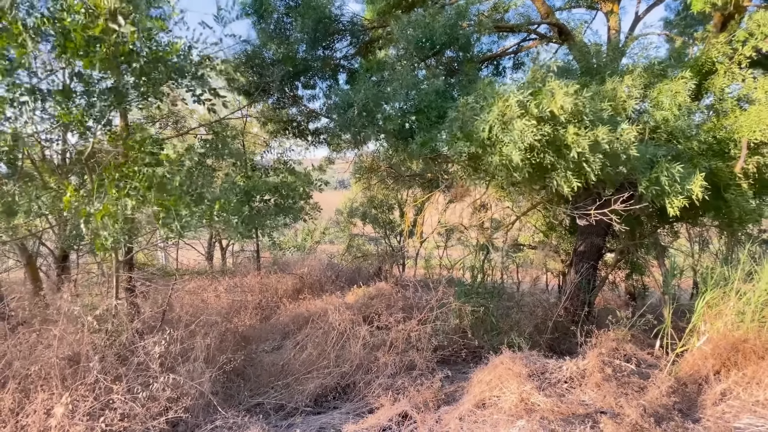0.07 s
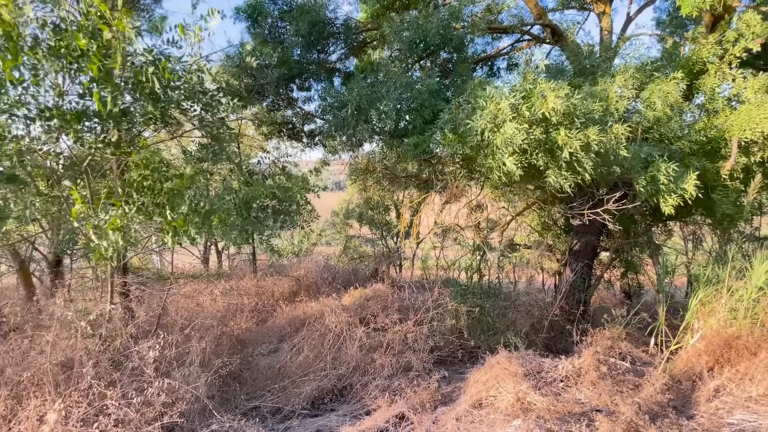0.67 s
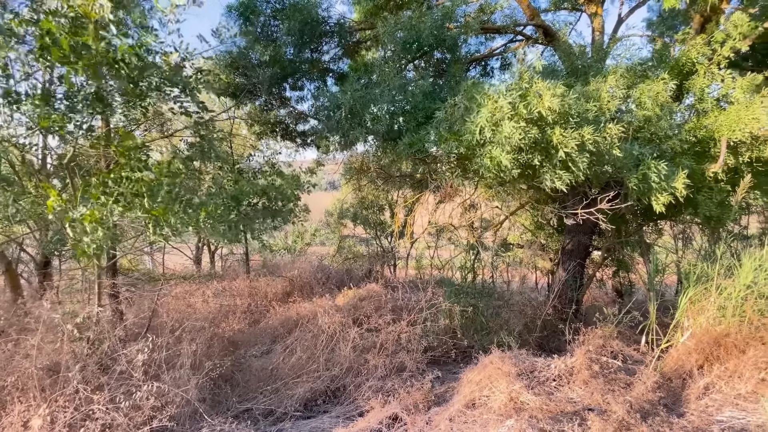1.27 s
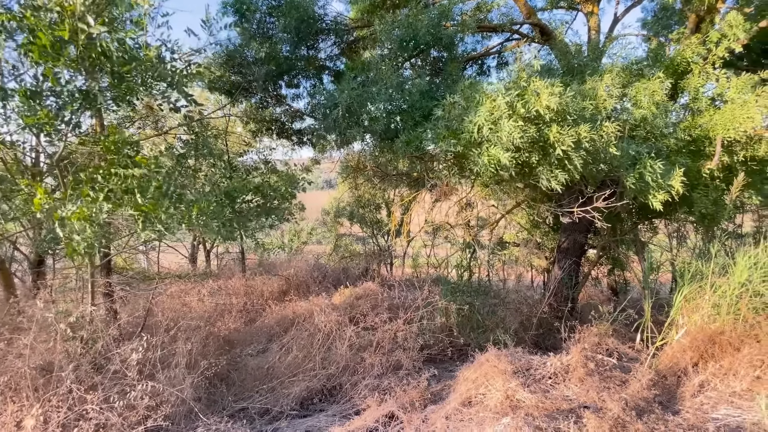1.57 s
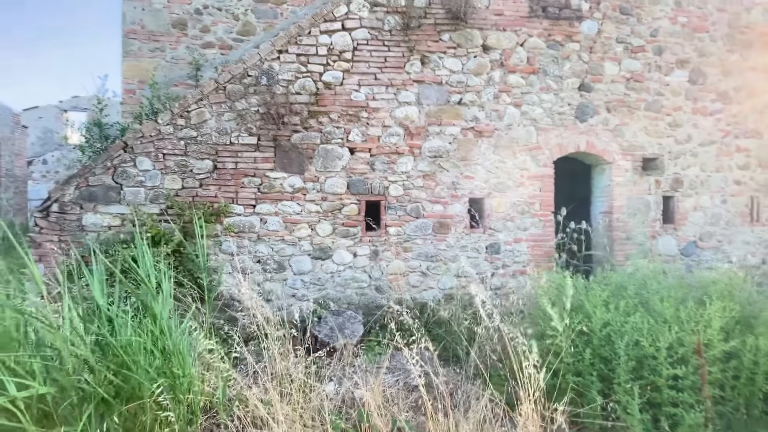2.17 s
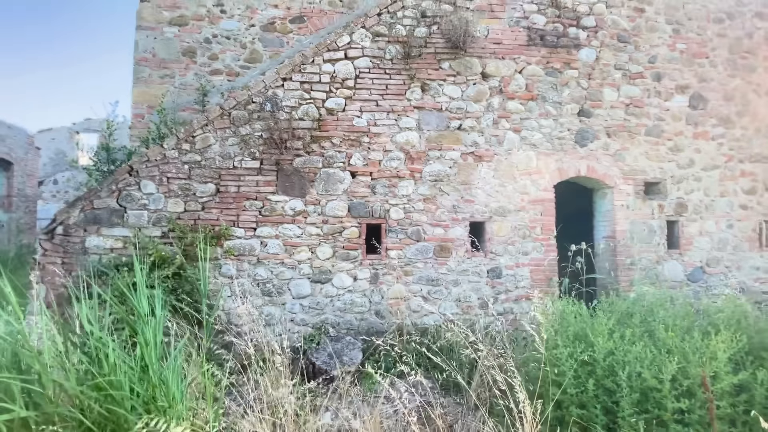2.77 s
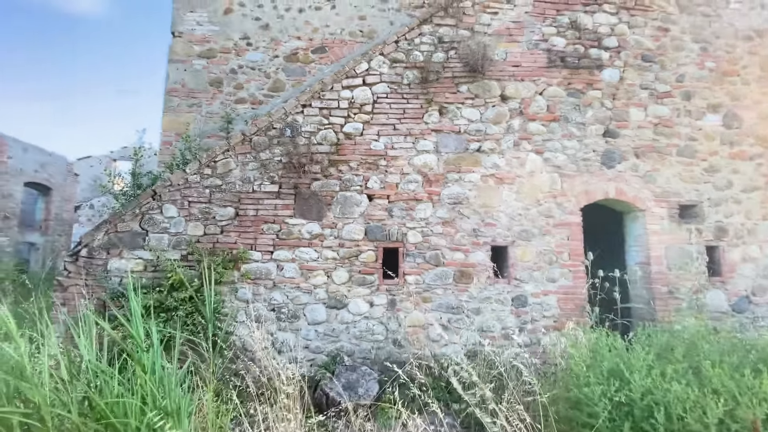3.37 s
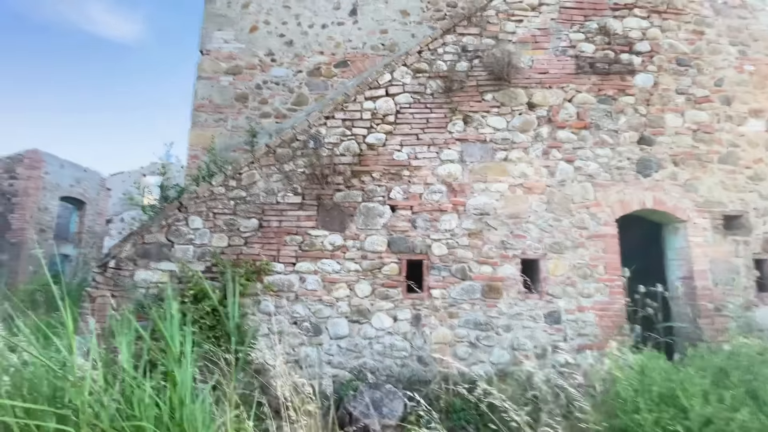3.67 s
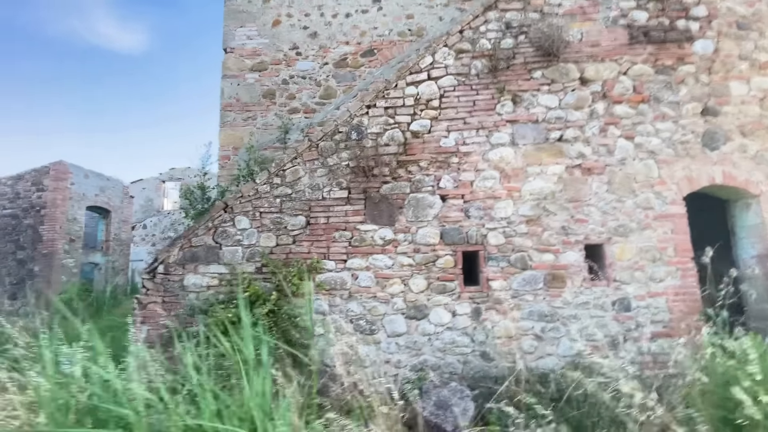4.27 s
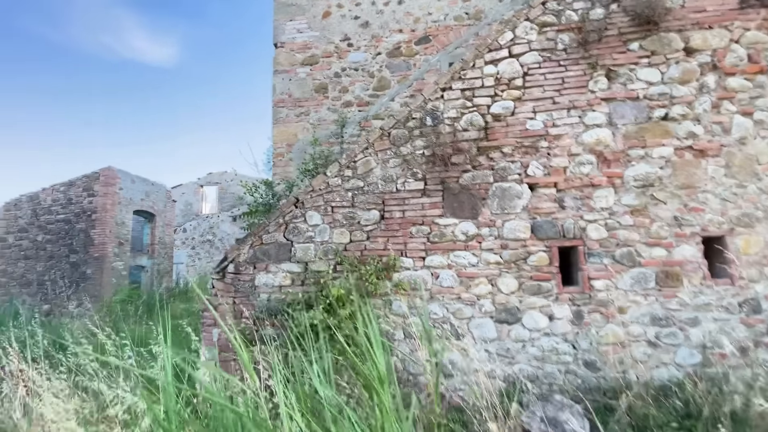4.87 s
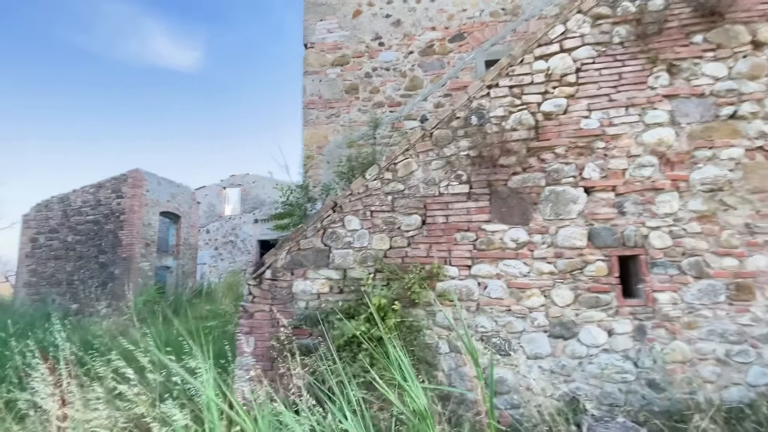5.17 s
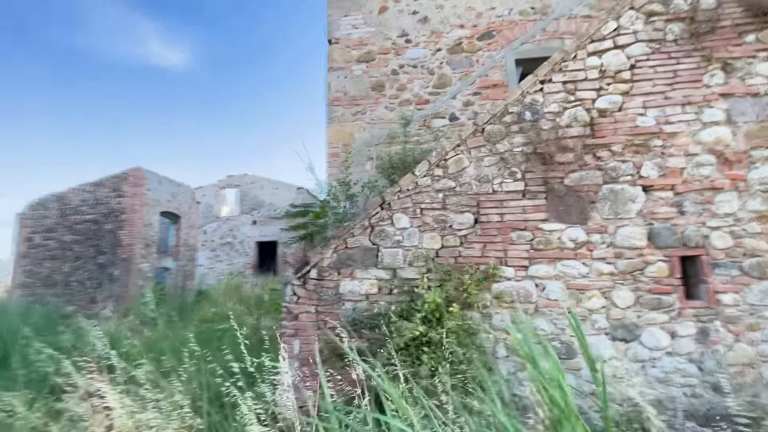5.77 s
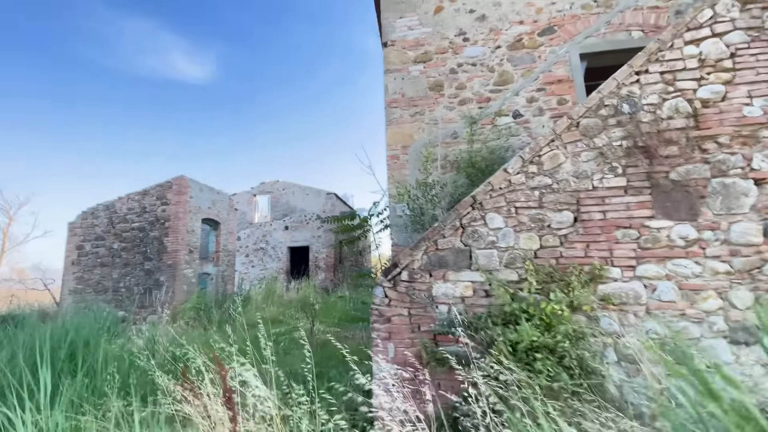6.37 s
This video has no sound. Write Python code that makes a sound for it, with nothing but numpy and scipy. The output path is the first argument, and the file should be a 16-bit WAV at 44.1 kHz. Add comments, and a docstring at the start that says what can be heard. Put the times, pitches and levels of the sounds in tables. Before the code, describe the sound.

Gusts thump on the microphone over a rasping cicada, as slow footsteps brush through dry grass and snap a few stalks.

```python
"""A slow walk through dry summer grass, with turbulence rumbling and fluttering on the two ports of a
hand-held microphone. First, by a thicket, a cicada rasps in shortening phrases as its tymbals buckle
and ring, and a small insect chips. From 2 s, along a stone ruin, the background is fuller, the cicada
keeps a steady beat and far birds call. After 3 s the gusts strike harder, and grass swishes against
the legs and fractures underfoot, with the loudest snap near 5.6 s."""
import sys
import numpy as np
from scipy import signal
from scipy.fft import rfft, irfft, next_fast_len
from scipy.io import wavfile
from scipy.ndimage import uniform_filter1d, map_coordinates

SR = 44100
rng = np.random.default_rng(int(sys.argv[2]) if len(sys.argv) > 2 else 0)


def log_audio(samples):
    """Write samples as a 16-bit WAV file to the path given in sys.argv[1]."""
    # one column per channel
    frames = np.atleast_2d(samples).T
    # limit to full scale, then quantise
    limited = np.clip(frames, -1, 1)
    pcm = np.round(limited * 32767).astype(np.int16)
    wavfile.write(sys.argv[1], SR, pcm)


N = 283033
TIME = np.arange(N) / SR


# Spectra of three sizes of eddy (frequency [Hz], relative density [dB])
LARGE_EDDY = [(12, -19), (25, -53), (40, -12.5), (62, -1.5), (100, -8), (150, -12.5), (250, -21.5),
              (600, -60)]
MIDDLE_EDDY = [(60, -11), (130, -1.5), (200, -0.5), (320, -1), (520, -7.5), (750, -17.5), (1300, -43.5),
               (3000, -80)]
SMALL_EDDY = [(200, -16), (450, 0), (680, 4), (1000, 1), (1400, -8), (2000, -24), (3000, -51), (6000, -76)]
# Balance of the wind between the ports (time [s], left minus right [dB])
WIND_PAN = [(0.0, 7), (1.85, 6.5), (2.1, 4.5), (3.3, -0.5), (3.66, 9), (4.3, -0.5), (6.42, 2)]

def wind(swing_db=1.5, swing_hz=9.3):
    """Turbulent pressure: large eddies rumble on the ports, smaller ones flutter higher and faster."""
    large, middle, small = gusts() * from_db(swing_db * drift(swing_hz))
    rumble = large * eddies(LARGE_EDDY, spurt_db=3, flutter_hz=22.6, alike=0.4, span_s=0.059)
    flutter = middle * eddies(MIDDLE_EDDY, spurt_db=4.5, flutter_hz=51.3, alike=-0.011, span_s=0.039)
    sputter = small * eddies(SMALL_EDDY, spurt_db=5.5, flutter_hz=91, alike=-0.15, span_s=0.05)
    pressure = from_db(2.5) * rumble + from_db(0.02) * flutter + from_db(1.57) * sputter * pan(3.7)
    return pressure * pan(in_time(WIND_PAN)[0])


def eddies(spectrum, spurt_db, flutter_hz, alike, span_s):
    """Intermittency: turbulence comes in ragged spurts, partly different at each port."""
    spurts = drift(flutter_hz) + 0.55 * np.array([drift(flutter_hz), drift(flutter_hz)])
    return evened(colour(stereo_noise(alike) * from_db(spurt_db * spurts), spectrum), span_s)


# Flow between gusts (time [s], large-eddy level [dB], middle-eddy level [dB])
BREEZE = [(0.0, -46.5, -48), (0.35, -55.5, -52), (1.1, -50.5, -46.5), (1.9, -47.5, -51.5),
          (2.13, -50.5, -57.5), (2.42, -41, -50.5), (2.54, -53.5, -62), (2.68, -41, -46.5),
          (3.05, -43, -49.5), (3.62, -41, -40), (3.85, -47, -44), (4.25, -49, -50), (4.6, -45.5, -41.5),
          (4.8, -52.5, -63), (4.97, -48.5, -53), (5.25, -45, -55), (5.6, -41.5, -48.5), (5.95, -41, -47),
          (6.22, -48.5, -60.5), (6.42, -49, -51)]
# Gusts; hardness trades rumble for flutter (start [s], end [s], strength [dB], hardness [dB])
GUSTS = [(0.207, 0.321, -58, 17), (0.403, 0.694, -50.5, 12), (1.052, 1.178, -43.5, 0),
         (1.297, 1.395, -45.5, 3), (2.025, 2.093, -44.5, -13), (2.161, 2.24, -53, -18.5),
         (2.747, 2.958, -41.5, -5.5), (2.808, 2.842, -39, 7.5), (3.129, 3.405, -33, 0.5),
         (3.412, 3.482, -37.5, 9.5), (3.512, 3.553, -38, 8.5), (3.591, 3.695, -45.5, -15.5),
         (3.728, 4.057, -49.5, 10.5), (4.032, 4.10, -35, -2), (4.409, 4.546, -34.5, -2),
         (4.893, 4.964, -44, -6.5), (5.007, 5.137, -38, -4), (5.171, 5.218, -40, -4),
         (5.281, 5.418, -36.5, -5), (5.43, 5.567, -41, -13.5), (5.738, 5.807, -35, -8.5),
         (6.334, 6.4, -47.5, -12.5)]

def gusts(rise_s=0.019, fall_s=0.028):
    """Incoherent addition: gusts and breeze sum in power, giving an amplitude for each eddy size."""
    rumble_db, flutter_db = in_time(BREEZE)
    power = from_db([rumble_db, flutter_db, flutter_db - 14.5]) ** 2
    for start, end, db, hard_db in GUSTS:
        rise = np.interp(TIME, [start - rise_s / 2, start + rise_s / 2], [0, 1])
        fall = np.interp(TIME, [end - fall_s / 2, end + fall_s / 2], [1, 0])
        amplitudes = from_db([db - 4 - 0.87 * hard_db, db, db - 9 + hard_db])   # large, middle, small
        power += np.outer(amplitudes, rise * fall) ** 2
    return np.sqrt(power)


# Spectrum of a crack of air (frequency [Hz], relative density [dB])
CRACK = [(200, -54), (500, 8), (900, 6.5), (1450, 0), (2000, -12), (3000, -29), (6000, -44)]
# Slaps of air (time [s], relative crack level [dB], relative thump level [dB])
BUFFETS = [(0.034, -44.5, -36), (0.087, -34.5, -30.5), (0.189, -45, -38.5), (0.386, -42, -46),
           (0.414, -33.5, -41), (0.432, -36.5, -43), (0.555, -30.5, -40.5), (0.665, -35.5, -52),
           (1.053, -33.5, -43), (1.074, -35, -37), (1.338, -34.5, -41), (1.441, -45.5, -36),
           (2.372, -50, -39.5), (2.827, -37, -29), (3.214, -22.5, -47), (3.235, -27.5, -30),
           (3.36, -32, -25), (3.42, -44, -30), (3.455, -36, -43), (3.528, -19.5, -39), (3.598, -36.5, -46),
           (3.678, -30, -32), (3.791, -23, -36), (3.935, -34, -36), (4.022, -32.5, -29.5),
           (4.52, -32, -29.5), (4.605, -60, -32.5), (4.641, -66, -35.5), (5.091, -39, -29.5),
           (5.348, -33.5, -31.5), (5.776, -32.5, -30.5)]

def buffets(haste=0.067, lowpass_hz=3600):
    """Pressure transients: an eddy bursts on a port with a thump and a crack, shorter when harder."""
    s, crack_db, thump_db = np.transpose(BUFFETS)
    shortening = from_db(-haste * (crack_db - np.median(crack_db)))
    crack = evened(colour(stereo_noise(0.27), CRACK), span_s=0.0013)
    crack *= bursts(s, crack_db - 5.5, rise_s=0.0027 * shortening)
    thump = evened(colour(stereo_noise(0.001), MIDDLE_EDDY), span_s=0.0044)
    thump *= bursts(s, thump_db - 0.5, rise_s=0.0045)
    lowpass = signal.butter(3, lowpass_hz, fs=SR, output="sos")
    return signal.sosfilt(lowpass, crack * pan(11.2) + thump * pan(2.5))


# Single large eddies (time [s], peak level [dB], centre frequency [Hz])
BUMPS = [(0.157, -32, 140), (0.724, -34, 88), (2.848, -24, 85), (2.927, -24.5, 175), (3.142, -23.5, 91.5),
         (5.107, -20.5, 125), (5.296, -33, 148), (5.783, -22, 170)]

def bumps():
    """Convected pressure: a passing eddy pushes once on the ports, with a dip before and after."""
    out = np.zeros(N)
    for s, db, hz in BUMPS:
        square = np.minimum((np.pi * hz * (TIME - s)) ** 2, 20)
        out += from_db(db) * (1 - 2 * square) * np.exp(-square)
    return out * pan(3.8)


# Spectra of leaves and of dry seed heads (frequency [Hz], relative density [dB])
SOFT_GRASS = [(400, -15), (1200, 4), (2000, -1.5), (2800, -4), (4000, -2.5), (6500, -1), (7800, -4.5),
              (9000, 5.5), (10000, -1.5), (12000, -9), (16000, -7)]
CRISP_GRASS = [(1000, -27), (4000, 1.5), (8000, -43), (10500, 1.5), (13000, 1.5), (14500, 5.5), (16000, 5)]
# Grass brushing the legs throughout (time [s], swish level [dB], crackle level [dB])
BRUSHING = [(0, -69, -92), (3.72, -72.5, -75), (3.8, -59, -58), (4.3, -64, -69), (5.35, -72, -63),
            (5.7, -68, -58), (6.42, -59, -60.5)]
# A leg passing through a tuft (peak time [s], level [dB], rise constant [s], decay constant [s])
SWEEPS = [(3.21, -60, 0.1, 0.043), (3.93, -54, 0.11, 0.17), (4.12, -55.5, 0.095, 0.092),
          (4.75, -58, 0.12, 0.35), (5.645, -45, 0.089, 0.074), (5.78, -49, 0.12, 0.064),
          (6.25, -56.5, 0.15, 0.12)]

def grass():
    """Friction noise: leaves swish and seed heads crackle, both swelling as a leg sweeps by."""
    soft_db, crisp_db = in_time(BRUSHING)
    sweeps = sum(from_db(db) * np.exp(-np.maximum((s - TIME) / swell, (TIME - s) / fade))
                 for s, db, swell, fade in SWEEPS)
    seed_share = from_db(0.87 * (crisp_db - crisp_db.max()) - 7.5)   # deep grass has more seed heads
    soft = blades(SOFT_GRASS, ticks_per_s=1400, hiss=1.0, alike=0.061)
    soft *= np.hypot(from_db(soft_db), sweeps)
    crisp = blades(CRISP_GRASS, ticks_per_s=1000, hiss=0.86, alike=0.98)
    crisp *= np.hypot(from_db(crisp_db), seed_share * sweeps)
    return soft * pan(2.4) + crisp * pan(0.77)


def blades(spectrum, ticks_per_s, hiss, alike, clump_db=2.0, spread_db=1.5):
    """Shot noise: countless blades tick past one another, in clumps, over a fine hiss."""
    contacts = rng.random(N) < ticks_per_s / SR
    sizes = from_db(spread_db * np.minimum(rng.exponential(1, N), 3.5))
    ticks = rms_one(stereo_noise(alike) * contacts * sizes)
    rustle = (ticks + hiss * stereo_noise(alike)) * from_db(clump_db * drift(36))
    return evened(colour(ground_echo(rustle, delay_s=0.0041, share=0.48), spectrum), span_s=0.043)


# Stalks breaking underfoot (time [s], relative splinter level [dB], relative woody level [dB])
SNAPS = [(1.338, -60, -44), (2.4843, -43, -60), (2.5104, -35, -42), (3.553, -54, -45), (3.7637, -23, -62),
         (3.8215, -21.5, -51), (3.8862, -20.5, -60), (3.9386, -28, -65), (4.1002, -30, -61),
         (5.631, -16.5, -34), (5.6553, -42, -43), (5.6854, -37, -47)]

def snaps():
    """Brittle fracture: a stalk fails fibre by fibre, with a bright splinter and a lower woody crack."""
    s, splinter_db, woody_db = np.transpose(SNAPS)
    fibres = from_db(2.5 * drift(730))
    splinter = colour(stereo_noise(0.1) * fibres,
                      [(3000, -6), (6000, -0.5), (9000, 7), (12000, 2.5), (16000, 5)])
    woody = colour(stereo_noise(0.47) * fibres,
                   [(600, 21), (1800, -4.5), (3500, 8.5), (5000, 7), (8000, -12), (16000, -22)])
    splinter *= bursts(s, splinter_db - 13, rise_s=0.001)
    woody *= bursts(s, woody_db - 1.5, rise_s=0.0026)
    return (splinter + woody) * pan(4.4)


# Tymbal resonances (frequency [Hz], relative density [dB])
TYMBAL = [(2500, -17), (3900, -25), (4400, -8), (4900, 3.5), (5250, -1.5), (5600, -10), (5900, -5),
          (6400, -16), (7000, -3), (7500, -24), (8500, -16), (10000, -20), (16000, -26.5)]
# The nearest cicada (time [s], relative level [dB], left minus right [dB], frequency scale [ratio])
SINGER = [(0, -63.5, 1, 0.96), (1.1, -57, 2, 1), (2.1, -56, 2, 1.006), (2.4, -60, -1, 1.01),
          (3.3, -62, 1.5, 1.005), (4.2, -63.5, 13.5, 1.015), (6.42, -61, 9.5, 1.003)]

def cicada(swell_s=0.052, fade_s=0.046, buckle_hz=220, rasp=0.48):
    """Driven resonance: tymbals buckle about two hundred times a second and ring near 5 kHz."""
    level_db, pan_db, speed = in_time(SINGER)
    effort = np.zeros(N)
    for start, end, db in phrases():
        corners = [start - swell_s / 2, start + swell_s / 2, end - fade_s / 3, end + fade_s]
        effort += from_db(db) * np.interp(TIME, corners, [0.00026, 0.82, 0.79, 0.0023])
    rate_hz = buckle_hz * (1 + 0.0614 * drift(34.7))
    buckles = 1 + rasp * np.cos(2 * np.pi * np.cumsum(rate_hz) / SR)
    ring = colour(stereo_noise(0.059) * buckles, TYMBAL)
    song = np.array([map_coordinates(side, [np.cumsum(speed)], mode="wrap") for side in ring])
    echoed = rms_one(ground_echo(song, delay_s=0.0031, share=0.84))
    return from_db(level_db + 1.94) * effort * echoed * pan(pan_db)


# Cicada phrases by the thicket (start [s])
OPENING = [0, 0.423, 0.845, 1.089, 1.315, 1.525, 1.71, 1.918]

def phrases(beat_from_s=2.029, beat_s=0.13975, jitter_s=0.005, accent_db=1.0):
    """Quasi-periodic rhythm: phrases (start, end, accent) shorten, then settle on a beat."""
    opening_rest_s, beat_rest_s = 0.071, 0.054
    beats = [OPENING[-1], *np.arange(beat_from_s, N / SR, beat_s)]
    spans = [(start, following - opening_rest_s) for start, following in zip(OPENING, OPENING[1:])]
    spans += [(start, start + beat_s - beat_rest_s) for start in beats]
    chance = rng.standard_normal((len(spans), 2)) * [jitter_s, accent_db]
    return [(start + late, end + late, db) for (start, end), (late, db) in zip(spans, chance)]


# Calls of the small insect (start [s], chips [count], relative level [dB])
CHIP_GROUPS = [(0.019, 1, -57), (0.145, 3, -58), (0.518, 2, -57.5), (0.804, 1, -57), (0.946, 1, -55),
               (1.085, 3, -55.5), (1.45, 3, -52.5), (1.834, 2, -52), (2.142, 1, -50), (5.244, 1, -51),
               (5.962, 3, -55), (6.369, 1, -46)]

def chip_train(period_s=0.107):
    """Pulse trains: chips (time, level) recur at a constant period within each group."""
    return [(start + k * period_s, db) for start, count, db in CHIP_GROUPS for k in range(round(count))]


def chips(start_hz=7600, end_hz=8700, length_s=0.014):
    """Frequency modulation: each chip is a brief upward sweep, made scratchy by random deviation."""
    out, size = np.zeros(N + SR), int(length_s * SR)
    scratch_hz = 260 * drift(900)
    for s, db in chip_train():
        at = max(int((s - length_s / 4) * SR), 0)
        hz = np.linspace(start_hz, end_hz, size) + np.resize(scratch_hz[at:], size)
        out[at:at + size] += from_db(db - 9) * np.hanning(size) * np.sin(2 * np.pi * np.cumsum(hz) / SR)
    return out[:N] * pan(6.9)


def sizzle():
    """Decaying band noise: a faint high hiss trails each chip."""
    s, db = np.transpose(chip_train())
    hiss = colour(stereo_noise(0.32),
                  [(8000, -18), (9500, -1), (10500, 9), (13000, -14), (15000, 12), (16000, -8)])
    return bursts(s, np.median(db) - 11.5, rise_s=0.0092) * hiss * from_db(1.9 * drift(60))


# Far bird calls (start [s], end [s], centre frequency [Hz], level [dB])
BIRD_CALLS = [(2.002, 2.455, 2157, -64), (4.35, 4.96, 2420, -64.5), (4.597, 4.917, 2870, -65),
              (5.145, 5.502, 2504, -69)]

def birds(blur_hz=105):
    """Spectral broadening: distance smears each call into a soft narrow band."""
    out = np.zeros((2, N))
    smear = np.array([drift(blur_hz) + 1j * drift(blur_hz) for side in range(2)])
    for start, end, hz, db in BIRD_CALLS:
        swell = np.sin(np.pi * np.clip((TIME - start) / (end - start), 0, 1))
        out += from_db(db) * swell * np.real(smear * np.exp(2j * np.pi * hz * TIME))
    return out * pan(-1.9)


# Background spectra of the two places (frequency [Hz], relative density [dB])
THICKET_AIR = [(40, 17.5), (300, 29), (900, -6), (1800, -8.5), (2700, 12), (3700, -6.5), (5000, 6),
               (7000, 8), (9500, -5), (13000, -1), (15000, -1)]
RUIN_AIR = [(40, 33.5), (300, 0), (1000, 17.5), (1800, 13.5), (2300, 11.5), (2700, 9), (4000, -3),
            (5000, -22), (6200, 5), (7800, 8), (8900, 11.5), (10000, 0), (12500, -19), (15000, -14)]

def air(thicket_db=-61.5, ruin_db=-55, ruin_from_s=1.97, crossfade_s=0.012):
    """Ambient noise: distant air and insects merge, quiet by the thicket and fuller by the ruin."""
    at_ruin = np.clip((TIME - ruin_from_s) / crossfade_s + 0.5, 0, 1)
    thicket = colour(stereo_noise(0.31), THICKET_AIR) * from_db(thicket_db + 3.2 * drift(7.6))
    ruin = colour(ground_echo(stereo_noise(0.24), delay_s=0.0066, share=0.34), RUIN_AIR)
    ruin *= from_db(ruin_db + 1.9 * drift(9.8))
    return ((1 - at_ruin) * thicket + at_ruin * ruin) * pan(0.2)


def ground_echo(x, delay_s, share):
    """Comb filtering: a second path by way of the ground ripples the spectrum."""
    return x + share * np.array([np.interp(TIME - delay_s, TIME, side, left=0) for side in x])


def from_db(db):
    """Decibel law: level to amplitude ratio."""
    return 10 ** (np.asarray(db) / 20)


def rms_one(x):
    """Normalisation to unit power."""
    return x / np.sqrt(np.mean(x ** 2) + 1e-20)


def in_time(rows):
    """Linear interpolation of each column at every sample."""
    s, *columns = np.transpose(rows)
    return [np.interp(TIME, s, c) for c in columns]


def pan(db):
    """Level difference as left and right gains."""
    return from_db(np.array([[0.5], [-0.5]]) * db)


def filtered(x, spectrum):
    """Linear filtering by a response (frequency [Hz], gain [dB])."""
    size = next_fast_len(N)
    hz, db = np.transpose(spectrum)
    bins = np.maximum(np.fft.rfftfreq(size, 1 / SR), 1)
    gain = from_db(np.interp(np.log(bins), np.log(hz), db))
    return irfft(rfft(x, size) * gain, size)[..., :N]


def colour(x, spectrum):
    """Spectral shaping at unit power."""
    return rms_one(filtered(x, spectrum))


def drift(hz):
    """Random fluctuation: low-passed noise of unit power."""
    lowpass = signal.butter(2, hz, fs=SR, output="sos")
    return rms_one(signal.sosfilt(lowpass, rng.standard_normal(N + SR))[SR:])


def stereo_noise(alike):
    """Partial coherence: white noise whose two sides have correlation `alike`."""
    mid, side = rng.standard_normal((2, N))
    return np.sqrt((1 + alike) / 2) * mid + np.sqrt((1 - alike) / 2) * side * [[1], [-1]]


def evened(x, span_s):
    """Running normalisation: unit power over span_s, keeping the faster texture."""
    size = max(int(span_s * SR), 2)
    power = uniform_filter1d(uniform_filter1d(np.mean(x ** 2, axis=0), size), size)
    return x / np.sqrt(power + 1e-12)


def bursts(times, levels_db, rise_s):
    """Critical damping: an envelope of pulses that swell for rise_s, then decay."""
    out = np.zeros(N)
    for s, db, rise in np.broadcast(times, levels_db, rise_s):
        part = out[max(int(s * SR), 0):][:SR // 6]
        age = np.arange(len(part)) / SR / rise
        part += from_db(db) * age * np.exp(1 - age)
    return out


def scene():
    """Superposition: the pressures of all sources add in the open air."""
    on_ports = wind() + buffets() + bumps()
    walking = grass() + snaps()
    wildlife = cicada() + chips() + sizzle() + birds()
    return on_ports + walking + wildlife + air()


# Stereo width: wide in the wind's range, nearly mono around 10 kHz (frequency [Hz], side gain [dB])
STEREO_WIDTH = [(30, 7), (70, 2.5), (150, 8), (300, 1.5), (600, 4.5), (1200, 0), (2200, 3), (4000, 2),
                (8700, -3.5), (10000, -25), (16000, -3)]

def record(dry, port_hz=8160, bandwidth_hz=326, cutoff_hz=15750):
    """Air resonance: the ports ring near 8 kHz. The image narrows around 10 kHz and the top is cut."""
    ringing = signal.lfilter(*signal.iirpeak(port_hz, port_hz / bandwidth_hz, fs=SR), dry)
    left, right = dry + np.array([[3.38], [0.3]]) * ringing   # the left port rings far more
    side = filtered((left - right) / 2, STEREO_WIDTH)
    stereo = (left + right) / 2 + side * np.array([[1], [-1]])
    return signal.sosfilt(signal.ellip(12, 0.1, 80, cutoff_hz, fs=SR, output="sos"), stereo)


dry = scene()
out = record(dry)
log_audio(out)
```